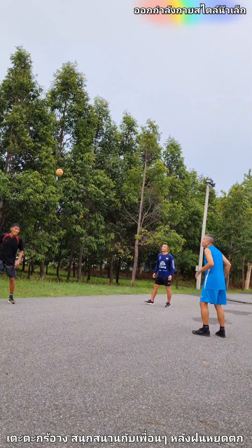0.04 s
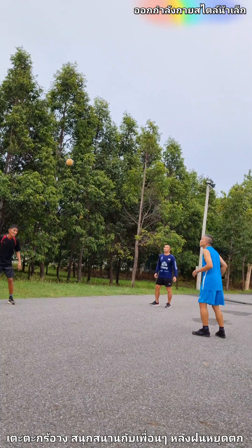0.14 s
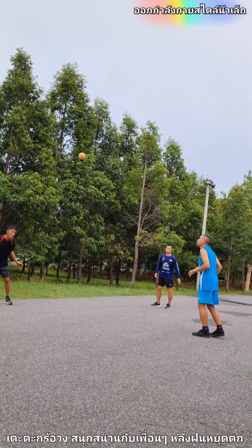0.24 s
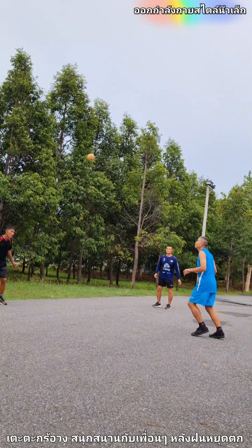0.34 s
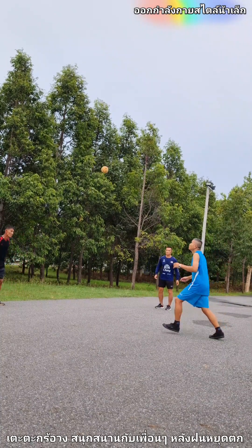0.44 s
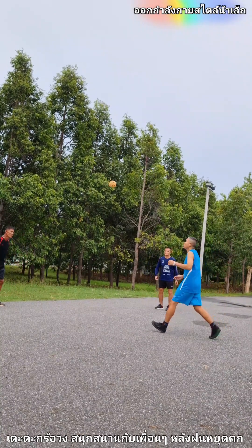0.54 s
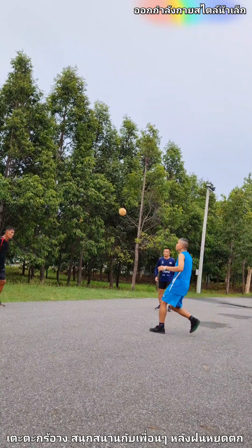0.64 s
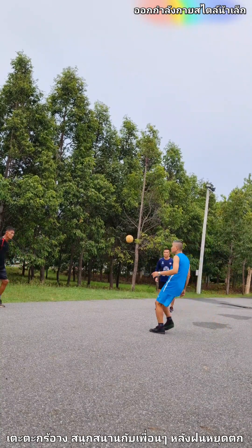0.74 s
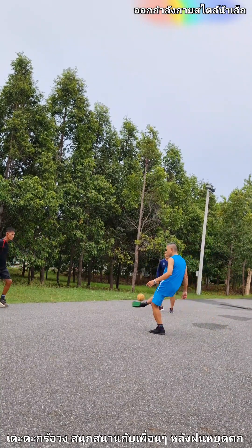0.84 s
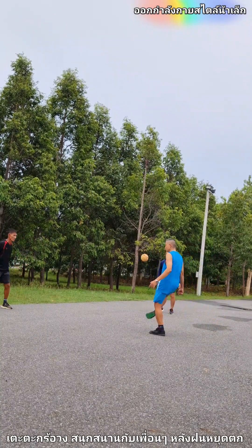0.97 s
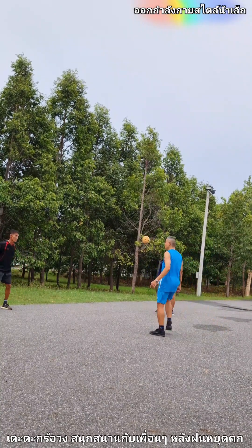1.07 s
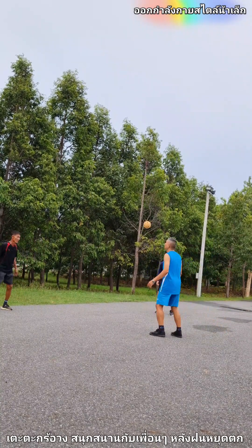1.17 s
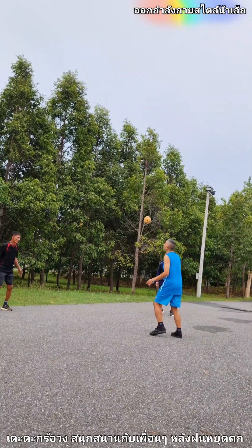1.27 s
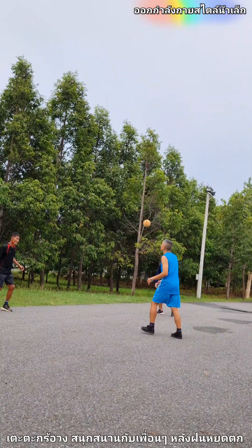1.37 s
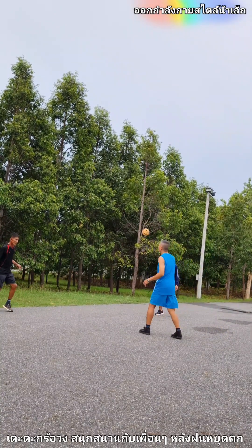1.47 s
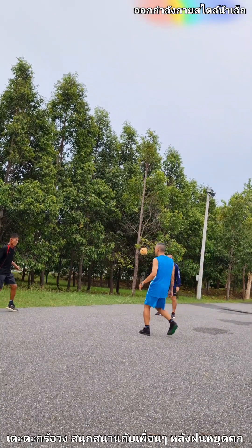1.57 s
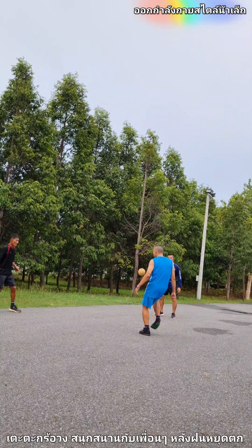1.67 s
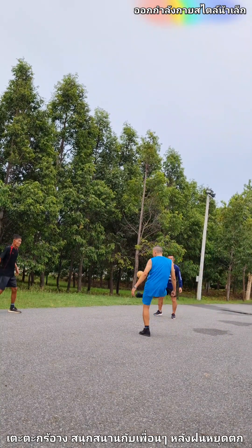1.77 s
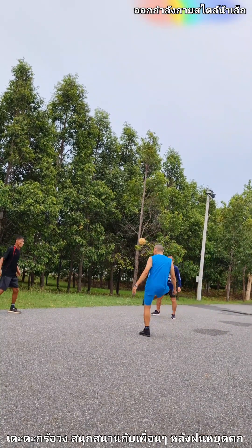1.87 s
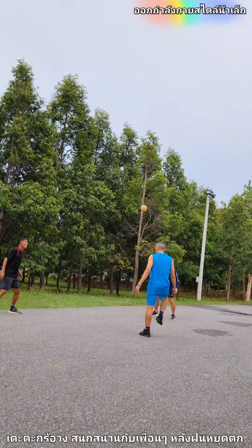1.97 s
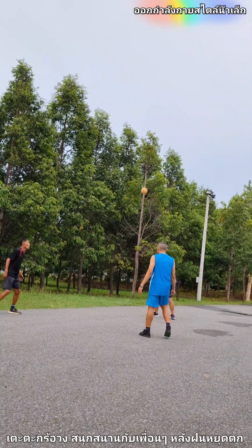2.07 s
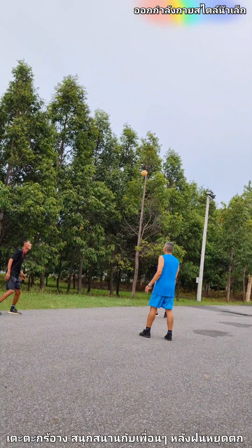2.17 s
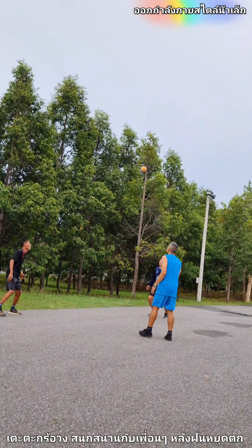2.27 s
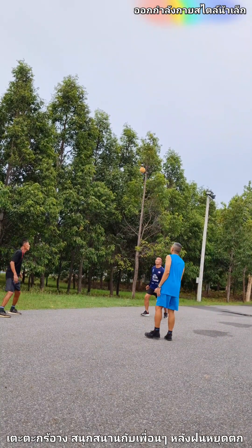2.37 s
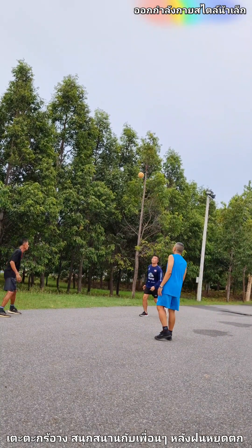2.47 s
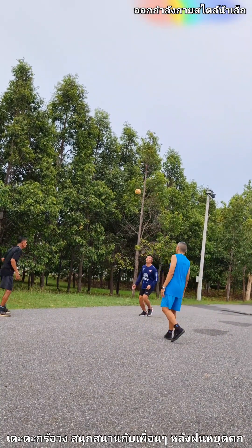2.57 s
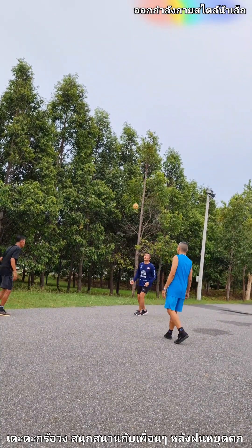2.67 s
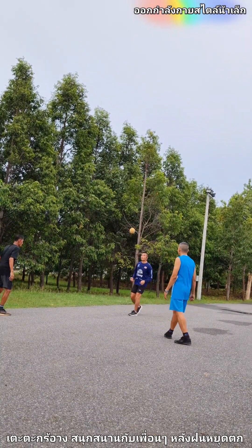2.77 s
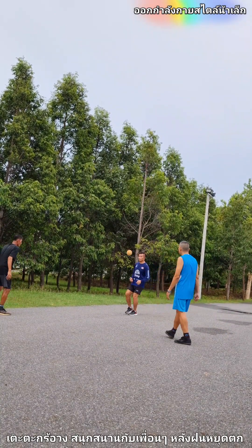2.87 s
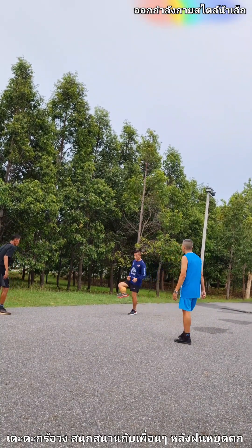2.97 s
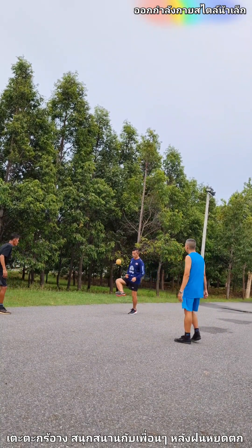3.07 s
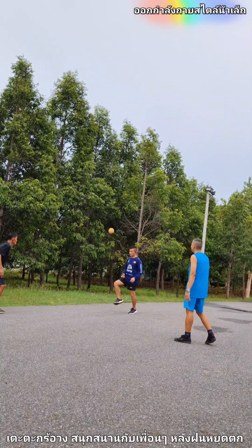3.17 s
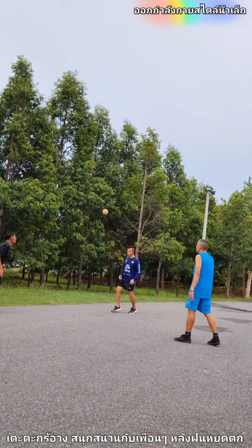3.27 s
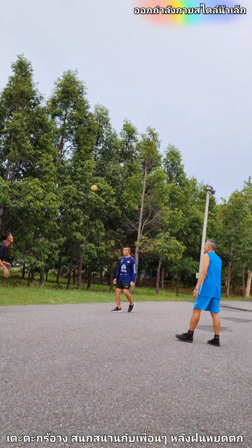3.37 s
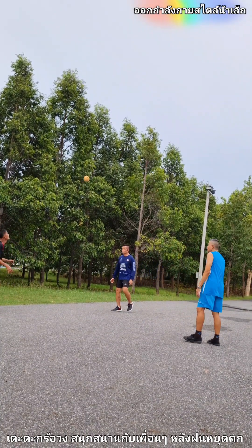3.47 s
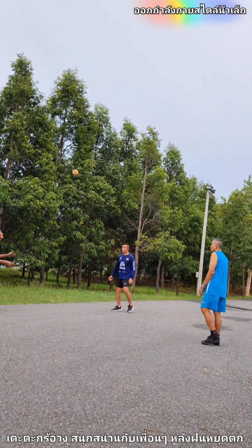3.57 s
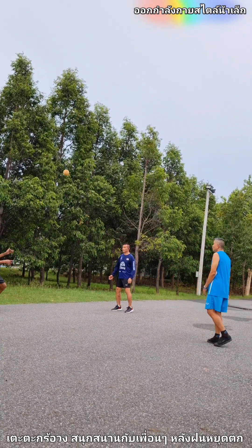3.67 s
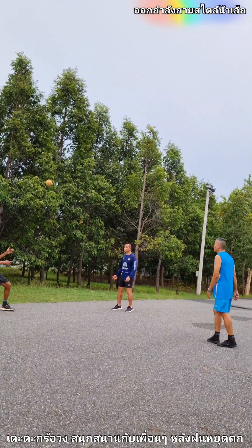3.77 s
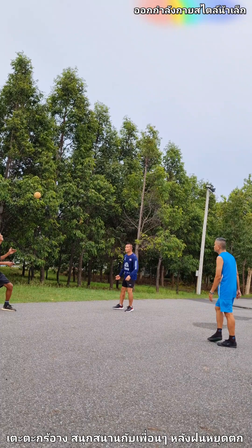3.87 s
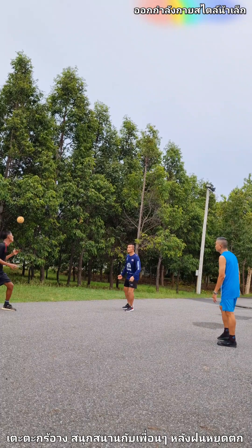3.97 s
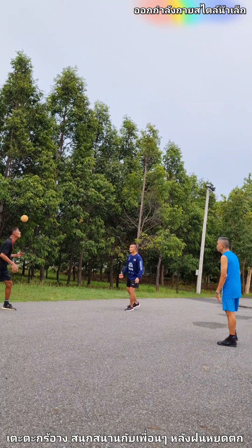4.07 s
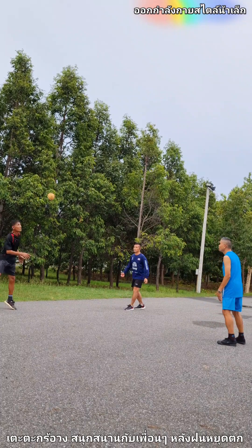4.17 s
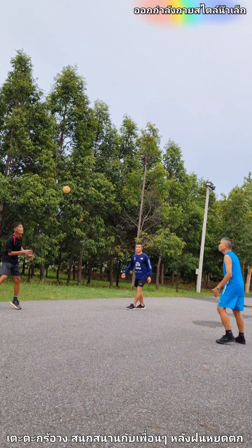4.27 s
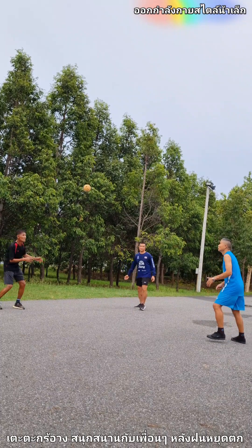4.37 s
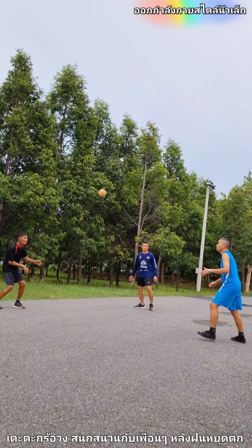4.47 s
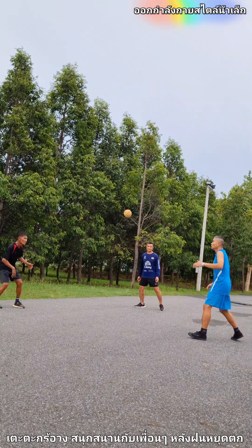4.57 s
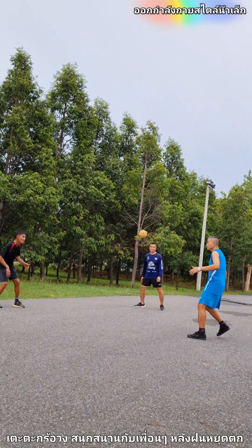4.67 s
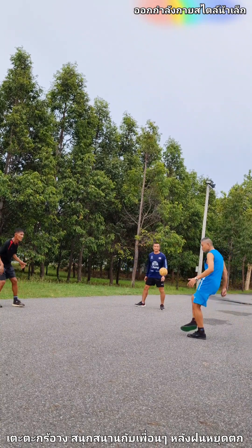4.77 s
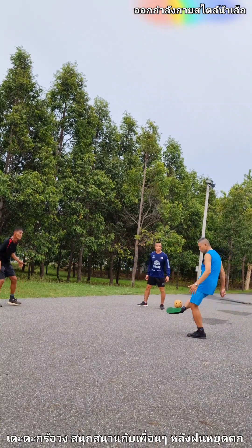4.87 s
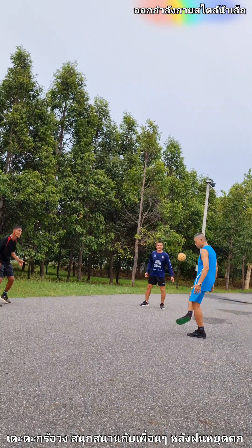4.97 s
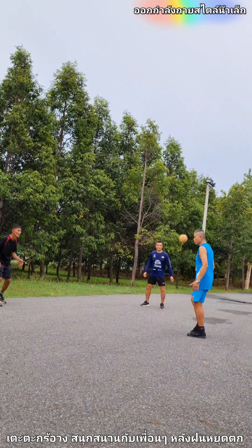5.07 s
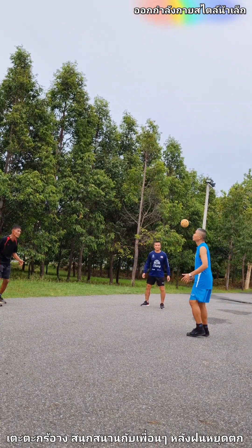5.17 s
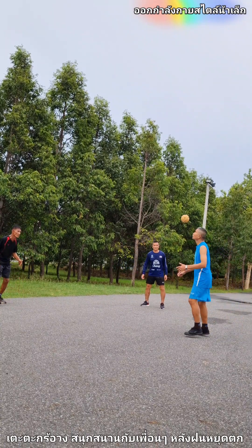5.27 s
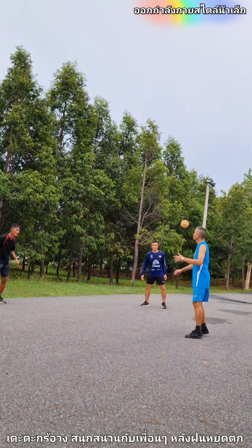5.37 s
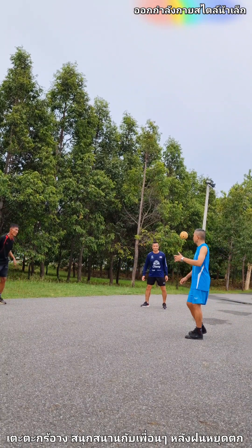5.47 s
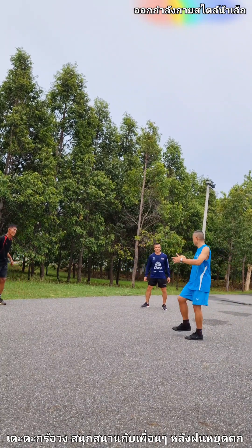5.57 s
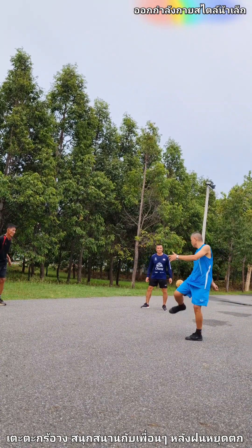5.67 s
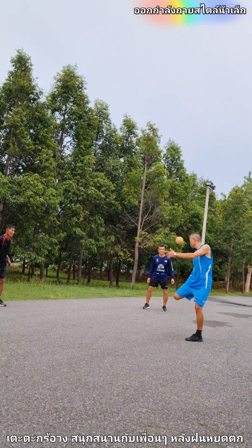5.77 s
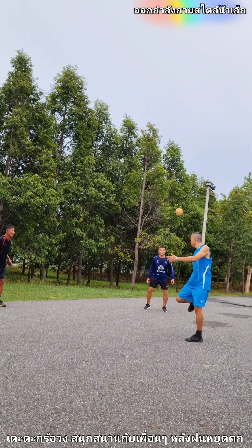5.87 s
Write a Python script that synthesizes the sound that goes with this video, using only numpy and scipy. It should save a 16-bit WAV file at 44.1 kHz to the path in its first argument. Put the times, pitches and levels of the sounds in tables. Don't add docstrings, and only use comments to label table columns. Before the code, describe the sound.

Sharp crackling knocks of a kicked woven ball, about one a second, with gritty shoe scuffs and a steady high insect buzz outdoors.

```python
import sys
import numpy as np
from scipy import signal
from scipy.fft import rfft, irfft
from scipy.io import wavfile
from scipy.ndimage import uniform_filter1d

SR = 44100
rng = np.random.default_rng(int(sys.argv[2]) if len(sys.argv) > 2 else 0)


def undo_db(level):
    steps = np.asarray(level, float) / 20
    return 10 ** steps


def wrap_up_sound(samples):
    columns = np.atleast_2d(samples).T
    tamed = np.clip(columns, -1, 1)
    steps = np.round(tamed * 32767).astype(np.int16)
    wavfile.write(sys.argv[1], SR, steps)


N = 261380
HZ = np.maximum(np.fft.rfftfreq(N, 1 / SR), 1)

# time in [s], level in [dB].
ROAD_LEVEL = [(0.0, -51), (0.41, -49), (1.45, -51), (3.2, -51), (3.71, -48.5), (5.0, -46.5), (5.53, -52.5),
              (5.93, -49.5)]
# frequency in [Hz], density in [dB per Hz].
ROAD_COLOUR = [(12, -57.5), (20, -17), (49, -1.5), (97, -1), (134, -8.5), (200, -9.5), (250, -17.5),
               (276, -15), (359, -24.5), (390, -24), (633, -31), (700, -38), (840, -38), (1600, -45),
               (2500, -49), (3250, -107.5), (5500, -120)]
# frequency in [Hz], density in [dB per Hz].
LEAF_COLOUR = [(1500, -8.5), (2700, -6), (4000, -6.5), (5000, -21), (5500, 7), (5850, -28), (6300, -9),
               (7500, -9), (9300, -7), (10500, -8), (12000, -8.5), (14000, -5), (16500, -6.5)]
LEAF_DB = -73
# centre in [Hz], width in [Hz], level in [dB].
INSECT_BODIES = [(4740, 860, -6.5), (6450, 640, -6.5), (7708, 810, 0.5), (11080, 1000, -22)]
CHORUS_DB, CHORUS_START_DB, CHORUS_SWELL_S = -59.5, -3, 0.065
# frequency in [Hz], level in [dB], t60 in [s].
TREE_SCATTER = [(400, -11.5, 0.91), (1010, -2.5, 0.42), (2100, -16.5, 0.56), (3450, -2, 0.59),
                (5000, -2, 0.59), (7460, 0, 0.47), (11000, -10, 0.51), (15000, -6, 0.46)]
TREE_BUILD_S, TREE_KNEE = 0.0078, 0.78

# start in [s], peak in [dB], pitch in [Hz], t60 in [s].
FOOT_TAPS = [(0.062, -52.5, 1800, 0.07), (0.114, -40.5, 380, 0.015), (0.182, -50, 473, 0.014),
             (0.655, -59, 1160, 0.012), (0.747, -53, 640, 0.008), (0.965, -37, 700, 0.015),
             (1.14, -45, 450, 0.033), (1.347, -63, 554, 0.012), (1.471, -56, 1070, 0.016),
             (2.127, -47.5, 891, 0.0074), (2.241, -51, 452, 0.021), (2.686, -40.5, 550, 0.02),
             (2.705, -36.5, 700, 0.015), (2.744, -35.5, 680, 0.044), (3.134, -49.5, 1040, 0.014),
             (3.258, -49.5, 1520, 0.012), (3.3, -47, 930, 0.027), (3.33, -47.5, 630, 0.014),
             (3.395, -44.5, 805, 0.022), (3.425, -50, 740, 0.019), (3.846, -50.5, 464, 0.028),
             (4.371, -47, 471, 0.0099), (4.414, -59, 560, 0.0045), (5.1165, -35.5, 766, 0.014),
             (5.1165, -34, 334, 0.019), (3.728, -55.5, 1890, .015), (5.422, -49, 1010, 0.0096),
             (5.476, -33.5, 1280, 0.0088), (5.866, -47, 975, 0.011)]
# loudest moment in [s], rise in [s], fall in [s], scuff in [dB],
# scratch relative to the scuff in [dB].
SOLE_SCUFFS = [(0.022, 0.04, 0.2, -62.5, -8), (0.195, .075, 0.074, -53.5, -3),
               (0.42, 0.095, 0.057, -59.5, -12), (0.672, 0.027, 0.034, -68, -6),
               (1.164, 0.038, 0.097, -61, -2), (1.348, 0.052, 0.014, -62, -13),
               (1.47, .09, 0.15, -70.5, -15), (2.126, 0.046, 0.064, -59, 1), (2.242, 0.13, .15, -71, -1),
               (2.382, 0.014, .07, -68, -4), (2.688, 0.013, 0.051, -47, -13),
               (2.758, 0.048, 0.018, -50.5, -2), (2.775, .02, 0.15, -65.5, 0.5), (3.27, 0.27, 0.19, -67, 2),
               (3.385, 0.2, 0.099, -67.5, -32), (3.655, 0.075, 0.18, -62, -7),
               (3.858, 0.0097, 0.086, -60, -9), (4.336, 0.037, .03, -55, -8),
               (4.384, 0.022, 0.092, -56, -4), (4.85, .03, 0.11, -65, 3), (4.885, 0.074, 0.1, -59.5, -6),
               (5.376, 0.041, 0.021, -69, 3), (5.47, 0.05, 0.014, -49.5, -12),
               (5.495, 0.075, 0.11, -57, 0.5)]
# [s, s, s, dB, dB].
FOOT_LANDINGS = [
    (0.968, 0.022, 0.11, -55, -15),
    (1.87, 0.1, 0.11, -62.5, 2),
    (3.115, 0.058, 0.05, -63.5, 1),
    (4.174, 0.12, 0.13, -62, -15),
    (4.94, 0.07, 0.19, -58.5, -13),
    (5.12, 0.13, 0.12, -63, -2),
    (5.82, 0.14, 0.67, -57, -1),
]
# [s, s, s, dB, dB].
TOE_BRUSHES = [
    (0.475, 0.059, 0.1, -74.5, 10),
    (4.66, 0.038, 0.081, -80, 8.5),
    (4.415, 0.008, .03, -71, 9),
    (6.4, 0.0089, 0.032, -64, 5),
    (1.9, 0.0054, 0.03, -64, 0),
    (4.4, 0.0028, 0.0098, -68, 15.5),
    (0.16, 0.011, 0.024, -64, -4),
]
SAND_FOLLOWS = 1.5
SCUFF_SAND_DB, LANDING_SAND_DB, BRUSH_SAND_DB = -6.5, -3, -18.0
DRAG_SPAN_DB, DRAG_FLATNESS = 20, 1.26
# frequency in [Hz], density in [dB per Hz].
CRUNCH_COLOUR = [(210, -51), (350, 3.5), (515, 3.5), (679, 2), (958, -0.5), (1320, -2.5), (2250, -9),
                 (2600, -11.5), (3380, -53.5), (5720, -120)]
# frequency in [Hz], density in [dB per Hz].
SCRATCH_COLOUR = [(1900, -15), (2600, 3.5), (3500, 4), (4700, 3.5), (5400, -2.5), (7000, -46)]
# frequency in [Hz], density in [dB per Hz].
SAND_COLOUR = [(5000, -26), (6500, 15.5), (9000, 1), (12000, 1), (16000, -5)]

# pitch in [Hz], time to full swing in [ms], signed size of first swing [factor].
BALL_MODES = [
    (122.7, 4.35, 0.28),
    (434, 1.22, -0.33),
    (976, 2, -0.46),
    (1710, 2.2, -0.17),
]
# start in [s], push in [dB], cavity in [dB], shell in [dB],
# pitch by where the ball is struck [factor].
BALL_BLOWS = [(0.9025, -20, -9, -68, 1.13), (0.9088, -30, -16, -47, 0.62), (0.917, -56, -34, -53, 1.1),
              (1.7737, -28.5, -25, -37.5, 1.04), (1.7825, -36, -60, -41, 1.1),
              (3.0248, -30, -23, -23.5, 1.03), (3.0314, -59, -36, -27.5, 0.98),
              (4.0701, -59, -55, -19.5, 1.053), (4.897, -25, -23, -37, 1.21), (4.9050, -35, -46, -34, 0.89),
              (5.7207, -29.5, -17, -35, 0.98), (5.7285, -32.5, -29, -54, 1.0),
              (5.7428, -40.5, -28, -44, 0.9)]
# start in [s], level in [dB], pitch [factor].
HOLE_RIM_HITS = [
    (0.909, -34, 0.8),
    (4.072, -29, 1.13),
    (4.897, -32, 1.27),
    (4.906, -35, 0.99),
    (5.72, -18.5, 0.917),
]
# frequency in [Hz], density in [dB per Hz].
RATTLE_COLOUR = [(150, 0.5), (280, 2), (500, -9), (800, -8), (1400, -22), (2200, -14.5)]
RATTLE_DB, RATTLE_T60_S = -5, 0.064
# start in [s], crackle in [dB],
# squeeze in [ms], sideways share in [dB], tree scatter in [dB].
STRAND_SQUEEZES = [(0.9026, -23, 5.9, 12, -46.5), (0.9086, -23, 5.1, 9, -57), (1.772, -30, 8.5, 5, -48.5),
                   (1.7781, -31.5, 9, 7, -52.5), (3.023, -28, 7.5, 12.5, -47), (3.0304, -21.5, 6.3, 5, -73),
                   (4.0696, -18, 5.4, 0, -49.5), (4.8961, -30.5, 10.5, 6, -47.5), (4.9055, -41, 25, 8, -67),
                   (5.7180, -26.5, 8.9, 10, -49.5), (5.725, -36, 11, 6, -53.5)]
# frequency in [Hz], density in [dB per Hz].
STRAND_COLOUR = [(880, -94), (1500, -44), (1680, -14.5), (2580, -16), (3280, -4), (3930, -7.5),
                 (4570, -1.5), (5810, -6), (6360, 1), (7850, 1.5), (10100, -5), (15200, -7.5), (16500, -6)]

# frequency in [Hz], left lag in [radians], left minus right in [dB],
# likeness of far sound [0 to 1].
MIC_PORTS = [(30.3, 0.017, 1.7, .99), (257, 0.2, 0.7, 1), (700, 0.15, 0.5, 0.68), (1540, 0.93, 5, 0.71),
             (2640, 2.02, 2.5, 0.9), (4530, 1.82, -3.5, 0.083), (7100, 0.44, -1, 1),
             (8400, 0.021, -4, 0.93), (12000, .05, -5, 0.99), (16500, 0.05, -6, 1)]
TOP_HZ = 15950


def rms_one(x):
    return x / np.sqrt(np.mean(x ** 2) + 1e-20)


def in_time(rows):
    s, *columns = np.transpose(rows)
    return [np.interp(np.arange(N) / SR, s, c) for c in columns]


def at_hz(points, hz, order=1):
    points = np.array(points)
    return np.interp(np.log(hz), np.log(points[:, 0]), points[:, order])


def colour(x, spectrum):
    hz = np.maximum(np.fft.rfftfreq(8192, 1 / SR), 1)
    below = np.log2(np.maximum(spectrum[0][0] / hz, 1))
    above = np.log2(np.maximum(hz / spectrum[-1][0], 1))
    shape_db = np.maximum(at_hz(spectrum, hz) - 18 * (below + above), -90)
    cepstrum = irfft(np.log(undo_db(shape_db)))
    cepstrum[1:4096] *= 2
    cepstrum[4097:] = 0
    response = irfft(np.exp(rfft(cepstrum)))
    return signal.fftconvolve(x, response[None], axes=-1)[:, :N]


def drift(rate):
    r = np.exp(-80 * np.pi * rate / SR)
    noise = rng.standard_normal(N // 40 + 2002)
    slow = rms_one(signal.lfilter([1], [1, -2 * r, r * r], noise)[2000:])
    return np.interp(np.arange(N) / 40, np.arange(len(slow)), slow)


def resonate(x, hz, width_hz):
    r = np.exp(-np.pi * width_hz / SR)
    zeros = np.array([1, 0, -1]) * (1 - r * r) / 2
    return signal.lfilter(zeros, [1, -2 * r * np.cos(2 * np.pi * hz / SR), r * r], x)


def grains(per_s, spread_db):
    sizes = undo_db(spread_db * np.minimum(rng.exponential(1, (2, N)), 4))
    signs = rng.choice([-1, 1], (2, N))
    return rms_one(sizes * signs * (rng.random((2, N)) < per_s / SR))


def ports(pair, directness):
    shared, unshared = rfft(pair)
    alike = np.clip(1 - (1 - at_hz(MIC_PORTS, HZ, order=3)) * (1 - directness), 0, 1)
    half = undo_db(at_hz(MIC_PORTS, HZ, order=2) / 2) * np.exp(-0.5j * at_hz(MIC_PORTS, HZ))
    a = np.sqrt((1 + alike) / 2) * shared
    b = np.sqrt((1 - alike) / 2) * unshared
    return irfft([(a + b) * half, (a - b) / half], N)


def background():
    road = rms_one(colour(rng.standard_normal((2, N)), ROAD_COLOUR))
    leaves = rms_one(colour(rng.standard_normal((2, N)), LEAF_COLOUR))
    road_db = in_time(ROAD_LEVEL)[0] + 0.73 * drift(1.16)
    return undo_db(road_db) * road + undo_db(LEAF_DB + 0.26 * drift(4.5)) * leaves


def insects():
    clicks, buzz = grains(6000, spread_db=2.5), 0
    for hz, width_hz, level_db in INSECT_BODIES:
        edges = [hz - width_hz / 2, hz + width_hz / 2]
        body = signal.butter(3, edges, "band", fs=SR, output="sos")
        buzz = buzz + undo_db(level_db + 0.39 * drift(19.0)) * rms_one(signal.sosfilt(body, clicks))
    yet_to_swell = np.maximum(1 - np.arange(N) / SR / CHORUS_SWELL_S, 0)
    return undo_db(CHORUS_DB - 5.0 + CHORUS_START_DB * yet_to_swell) * buzz


def trees():
    t, echo = np.arange(SR // 2) / SR, 0
    blows = np.zeros(N)
    blows[[round(row[0] * SR) for row in STRAND_SQUEEZES]] = undo_db(2 * np.array(STRAND_SQUEEZES)[:, 4])
    white = rng.standard_normal((2, 2, N))
    lumps_db = 1.85 * drift(64.0)
    build = 1 - np.exp(-(t / TREE_BUILD_S) ** 2)
    for k, low in enumerate(280 * 2 ** np.arange(0, 6, 0.5)):
        half_octave = signal.butter(2, [low, low * np.sqrt(2)], "band", fs=SR, output="sos")
        band = signal.sosfilt(half_octave, white[k % 2])
        hz = low * 2 ** 0.25
        t60 = at_hz(TREE_SCATTER, hz, order=2)
        fall_db = at_hz(TREE_SCATTER, hz) + 14 - 60 * (t / t60) ** TREE_KNEE
        power = signal.fftconvolve(blows, undo_db(2 * fall_db) * build)[:N]
        echo = echo + band * np.sqrt(np.abs(power)) * undo_db(lumps_db + 1.0 * drift(36.0))
    return echo


def taps():
    out, t = np.zeros((2, N + 1024)), np.arange(1024) / SR
    for s, peak_db, hz, t60 in FOOT_TAPS:
        at = round(s * SR)
        fade = undo_db(-60 * t / max(t60, 0.003)) * (1 - np.exp(-t / 0.001))
        crushed = rng.standard_normal((2, 1024)) * fade
        ring = resonate(resonate(crushed, hz, 270), hz, 790)
        ring = ring + 0.096 * resonate(resonate(crushed, 2 * hz, 1100), 2 * hz, 1400)
        out[:, at:at + 1024] += undo_db(peak_db - 0.5) * ring / np.abs(ring[0]).max()
    return out[:, :N]


def scuffs():
    drags, t = np.zeros((3, N)), np.arange(N) / SR
    kinds = ((SOLE_SCUFFS, SCUFF_SAND_DB), (FOOT_LANDINGS, LANDING_SAND_DB), (TOE_BRUSHES, BRUSH_SAND_DB))
    for rows, sand_db in kinds:
        for s, rise_s, fall_s, level_db, scratch_db in rows:
            away = np.maximum((s - t) / max(rise_s, 0.002), (t - s) / max(fall_s, 0.002))
            near = away < 3
            pressure_db = level_db - DRAG_SPAN_DB * away[near] ** DRAG_FLATNESS
            drags[:, near] += undo_db(pressure_db + [[0], [scratch_db], [SAND_FOLLOWS * scratch_db + sand_db]])
    drags = uniform_filter1d(drags, size=200) * undo_db(1.4 * drift(47.0))
    grit = grains(3500, spread_db=3.8)
    colours = (CRUNCH_COLOUR, SCRATCH_COLOUR, SAND_COLOUR)
    return sum(rms_one(colour(grit, c)) * drag for c, drag in zip(colours, drags))


def swing(mode, level_db, pitch):
    hz, ms, sign = mode
    t = np.arange(4096) / SR
    x = t / (ms / 1000)
    shape = (x * np.exp(1 - x)) ** 3
    return sign * undo_db(level_db + 5.0) * shape * np.sin(2 * np.pi * hz * pitch * t)


def knocks():
    out, shaking, t = np.zeros((2, N + 4096)), np.zeros(N + 4096), np.arange(4096) / SR
    for s, *strengths_db, pitch in BALL_BLOWS:
        at = round(s * SR)
        for mode, level_db in zip(BALL_MODES, strengths_db):
            out[0, at:at + 4096] += swing(mode, level_db, pitch)
        rattle_db = strengths_db[0] + RATTLE_DB - 60 * t / RATTLE_T60_S
        shaking[at:at + 4096] += undo_db(rattle_db) * np.minimum(t / 0.0029, 1)
    for s, level_db, pitch in HOLE_RIM_HITS:
        at = round(s * SR)
        out[0, at:at + 4096] += swing(BALL_MODES[-1], level_db, pitch)
    rattle = rms_one(colour(grains(12000, spread_db=4.5), RATTLE_COLOUR))
    return out[:, :N] + shaking[:N] * rattle


def burst(t, ms):
    x = t / (max(ms, 1.5) / 1000)
    return np.sin(np.pi * np.minimum(x, 1)) + 0.077 * (x > 0.5) * np.exp(-x / 1.5)


def kicks():
    snaps = rms_one(colour(grains(16000, spread_db=2), STRAND_COLOUR))
    squeeze, t = np.zeros((2, N)), np.arange(2048) / SR
    for s, crackle_db, ms, sideways_db, _ in STRAND_SQUEEZES:
        at = round(s * SR)
        squeeze[:, at:at + 2048] += undo_db([[crackle_db], [crackle_db + sideways_db]]) * burst(t, ms)
    return undo_db(-4.0) * snaps * squeeze


def scene():
    far = ports(background() + insects(), directness=0.019)
    scatter = ports(trees(), directness=-0.016)
    feet_and_ball = ports(taps() + scuffs() + knocks(), directness=0.72)
    crackle = ports(kicks(), directness=-1.4)
    return far + scatter + feet_and_ball + crackle


def top_cut(x):
    return signal.sosfilt(signal.butter(12, 16990, fs=SR, output="sos"), x)


def record(dry):
    low_pass = signal.cheby2(10, 36, TOP_HZ + 350, fs=SR, output="sos")
    return top_cut(signal.sosfilt(low_pass, dry))


dry = scene()
out = record(dry)
wrap_up_sound(out)
```